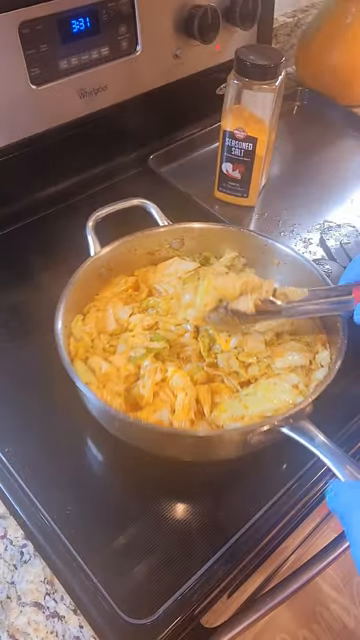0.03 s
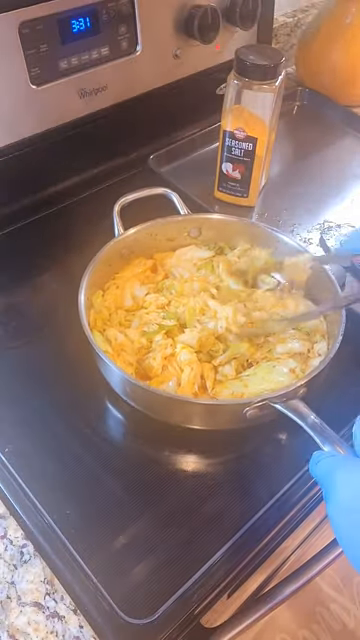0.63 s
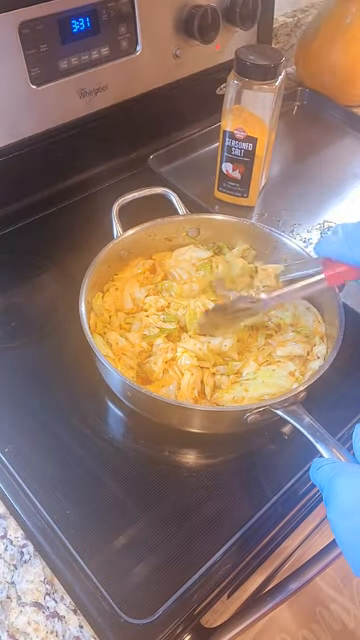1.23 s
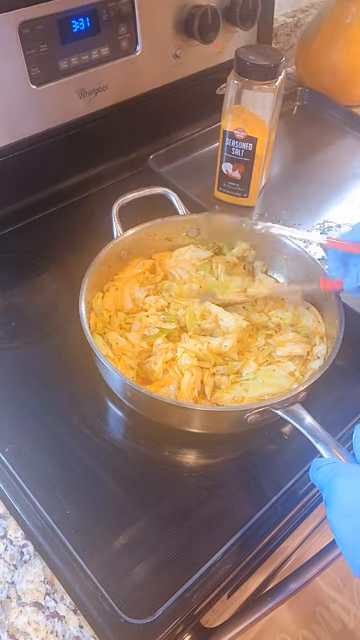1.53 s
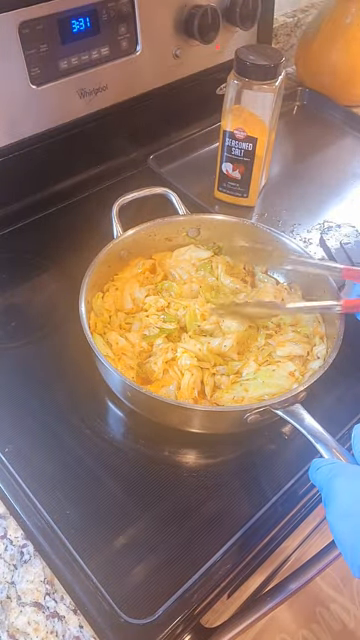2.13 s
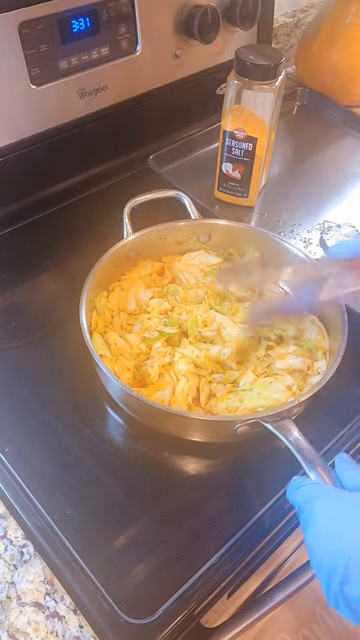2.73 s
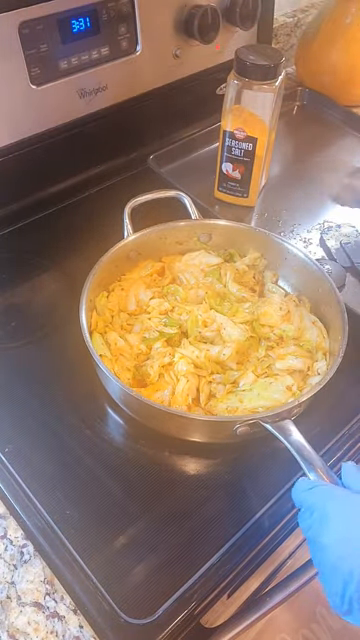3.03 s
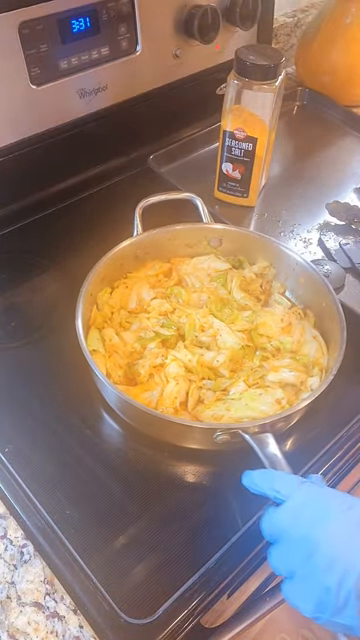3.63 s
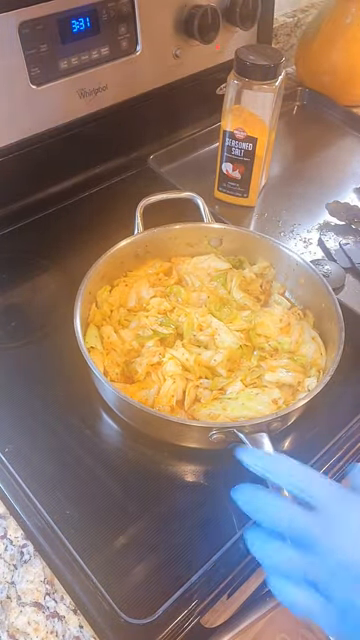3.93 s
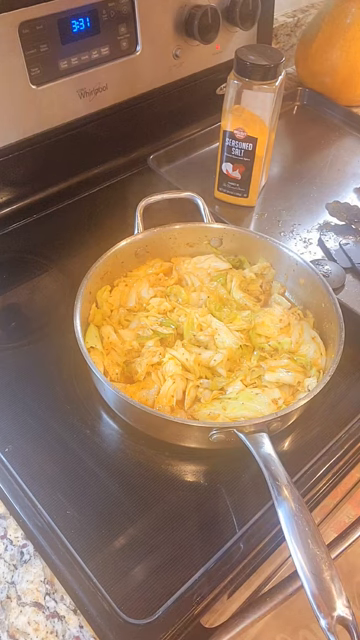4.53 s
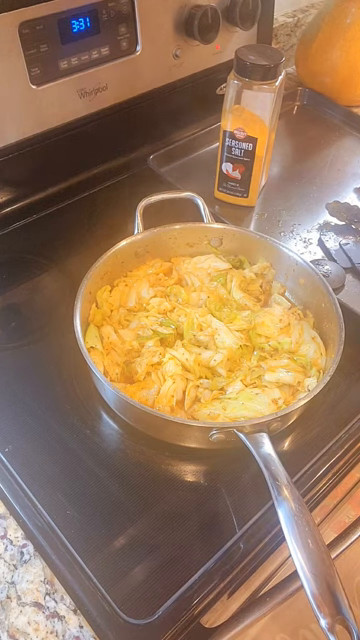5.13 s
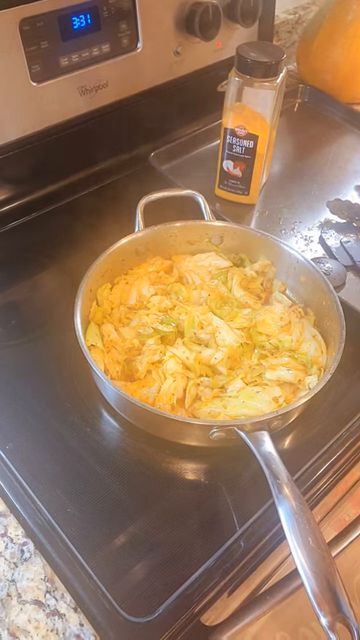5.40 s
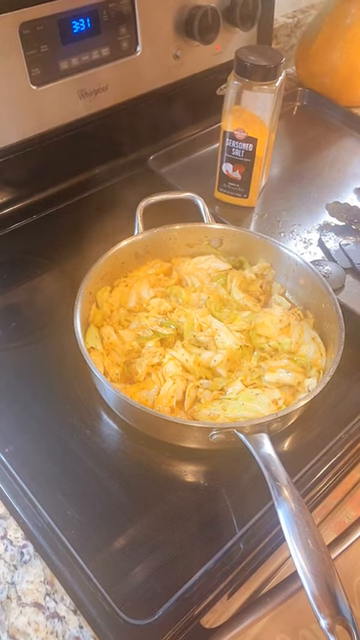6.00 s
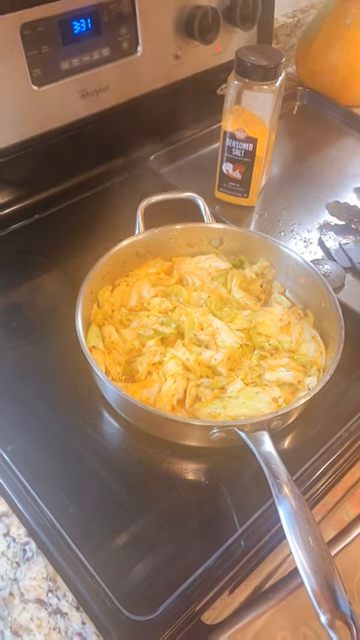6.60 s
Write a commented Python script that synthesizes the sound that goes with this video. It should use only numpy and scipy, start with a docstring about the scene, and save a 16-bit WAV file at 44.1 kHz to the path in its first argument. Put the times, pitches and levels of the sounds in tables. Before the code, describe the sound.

An appliance hums low in a kitchen while cabbage fries faintly in a steel skillet, heard in stereo from close by. A loud clank of tongs on the pan thumps the hollow stove top, followed by a soft, wet tossing of leaves. Three bright taps ring on the rim, and the tongs land on a metal tray with a short clatter. Quiet sizzling, small oil pops and a few light ticks remain.

```python
"""A kitchen, stereo microphone close to the stove. An appliance hums low in the room while cabbage
sizzles faintly in a steel skillet on a glass cooktop, bubbles bursting in the hot oil.
Tongs toss the food and knock the skillet against the stove, are tapped three times on its rim, then
clatter down on a metal tray: each blow sets the steel ringing, thumps the hollow stove top and dies
away in the room. A few light utensil ticks follow."""
import sys
import numpy as np
from scipy import signal
from scipy.fft import rfft, irfft, next_fast_len
from scipy.io import wavfile

SR = 44100
rng = np.random.default_rng(int(sys.argv[2]) if len(sys.argv) > 2 else 0)


def int16_out(signal):
    """Quantize to a 16-bit WAV file."""
    q = np.round(np.clip(np.atleast_2d(signal).T, -1, 1) * 32767)
    wavfile.write(sys.argv[1], SR, q.astype(np.int16))


N = 298116
TIME = np.arange(N) / SR
AGE = TIME[:SR * 2 // 5]   # the 0.4 s that follow a blow
EDGES = np.geomspace(22, 17000, 30)   # third-octave bands, Hz
CENTRES = np.sqrt(EDGES[1:] * EDGES[:-1])
BANK = [signal.butter(2, pair, "band", fs=SR, output="sos") for pair in zip(EDGES, EDGES[1:])]
# sound from close to the microphone: f/Hz, left-right likeness
NEAR_LIKENESS = [(100, 0.88), (300, 0.97), (700, 0.96), (2000, 0.17), (12000, 0.036)]


def from_db(db):
    """Decibels to gain."""
    return 10 ** (np.asarray(db) / 20)


def rms_one(x):
    """Scale to rms 1."""
    return x / np.sqrt(np.mean(x ** 2) + 1e-20)


def energy_one(x):
    """Scale a short sound to an average energy of 1 per channel."""
    return rms_one(x) / np.sqrt(x.shape[-1])


def in_time(points):
    """Read a table at every sample of the scene."""
    return np.interp(TIME, *np.transpose(points))


def at_hz(points, hz):
    """Read a table on a log-frequency axis."""
    table_hz, values = np.transpose(points)
    return np.interp(np.log(hz), np.log(table_hz), values)


def add(out, s, sound):
    """Mix a sound in at time s."""
    i = round(s * SR)
    out[:, i:i + sound.shape[-1]] += sound[..., :N - i]


def dying(t60):
    """Exponential decay, 60 dB down after t60 seconds."""
    return np.exp(-np.log(1000) * AGE / t60)


def drift(rate):
    """Random wander of rms 1, turning rate times a second."""
    knots = rng.standard_normal(1024)
    return rms_one(np.interp(TIME * rate, np.arange(len(knots)), knots))


def filtered(x, order, hz, kind="band"):
    """Butterworth filter."""
    return signal.sosfilt(signal.butter(order, hz, kind, fs=SR, output="sos"), x)


def resonate(x, hz, width):
    """A resonance with gain 1 at its peak."""
    r = np.exp(-np.pi * width / SR)
    feedback = [1, -2 * r * np.cos(2 * np.pi * hz / SR), r * r]
    return signal.lfilter(np.array([1, 0, -1]) * (1 - r * r) / 2, feedback, x + 1e-18)


def peaking(x, peaks):
    """Lift or hollow out a chain of bands."""
    for hz, width, db in peaks:
        x = x + (from_db(db) - 1) * resonate(x, hz, width)
    return x


def bell_curve(hz, centre_hz, octaves):
    """Gaussian weight around one pitch."""
    return np.exp(-.5 * (np.log2(hz / centre_hz) / octaves) ** 2)


def noise_bands(likeness, size, low=0, high=SR):
    """Third-octave stereo noise; neighbouring bands are unrelated."""
    white = rng.standard_normal((2, 2, size))
    for k, (sos, hz) in enumerate(zip(BANK, CENTRES)):
        if low < hz < high:
            mid, side = signal.sosfilt(sos, white[k % 2])
            alike = np.clip(at_hz(likeness, hz), -1, 1)
            yield hz, np.sqrt(1 + alike) * mid + np.sqrt(1 - alike) * side * [[1], [-1]]


def wash(colour, flicker_db):
    """Steady, diffuse coloured noise whose bands flicker a little."""
    # sound arriving from all round the room: f/Hz, left-right likeness
    far_likeness = [(60, 0.88), (150, 0.42), (380, 0.62), (950, 0.12), (2380, -2.6), (5980, -0.13),
                    (15000, 0.024)]
    bands = noise_bands(far_likeness, N, low=colour[0][0], high=colour[-1][0])
    return rms_one(sum(band * from_db(at_hz(colour, hz) + flicker_db * drift(11)) for hz, band in bands))


def room_tone():
    """In the background an appliance motor hums, wavering, over a low rush of air."""
    # motor tones: f/Hz, level/dB, waver/Hz
    motor_tones = [(104.5, -58, 1.32), (209.8, -62.5, 4.3), (280, -65, 4.42), (525, -68, 9.66),
                   (932, -77, 6.22), (1140, -86, 8.5), (1398, -77.5, 8.15)]
    # course of the rush of air: t/s, level/dB
    air_level = [(0, -51.5), (1.6, -53.5), (3.2, -51), (4.5, -51.5), (6.76, -50.5)]
    # its spectrum: f/Hz, level/dB
    air_colour = [(15, -57), (25, -66), (43, -8.5), (75, -7.5), (85, -18), (106, -24), (121, -1.5),
                  (140, -35), (214, 2.5), (238, -6), (308, -5.5), (445, -21), (525, -11), (800, -21),
                  (1400, -24.5), (2000, -36), (2600, -64), (4400, -120)]
    hum = np.zeros(N)
    for hz, db, waver in motor_tones:
        amplitude = np.sqrt(2) * from_db(db + 2 * drift(19))
        hum += amplitude * np.sin(2 * np.pi * np.cumsum(hz + waver * drift(40)) / SR)
    return hum + from_db(in_time(air_level) - 4) * wash(air_colour, flicker_db=1.8)


def oil_crackle(per_s=200, spread_db=7):
    """The finest bursts in the oil, uneven in size, each ring briefly at one of a few bright pitches."""
    # bright pitches at which the crackle rings: f/Hz, width/Hz, level/dB
    crackle_bands = [(3260, 340, 10), (4200, 220, 5.5), (5180, 1370, 5)]
    crackle = np.zeros(N)
    for hz, width, db in crackle_bands:
        clicks = np.zeros(N)
        at = np.flatnonzero(rng.random(N) < per_s / SR)
        signs = rng.choice([-1, 1], len(at))
        sizes = np.minimum(rng.exponential(1, len(at)), 2.5)
        clicks[at] = signs * from_db(db + spread_db * sizes)
        crackle += resonate(resonate(resonate(clicks, hz, width), hz, 2 * width), hz, 4 * width)
    return rms_one(crackle)


def small_bubbles(per_s=17, level_db=-54, spread_db=4, middle_hz=5000, octaves=0.286):
    """Smaller bubbles burst at random: rows of t/s, level/dB, f/Hz."""
    times = np.cumsum(rng.exponential(1, size=200)) / per_s
    sizes, pitches = np.clip(rng.standard_normal((2, 200)), -2, 2)
    rows = zip(times, level_db + spread_db * sizes, middle_hz * 2 ** (octaves * pitches))
    return [row for row in rows if row[0] < TIME[-1]]


def oil_pops(rise_s=.0009):
    """Bubbles burst on the right of the pan, each a short ping with a spit of noise."""
    # the loudest bubbles: t/s, level/dB, f/Hz
    loud_bubbles = [(0.623, -49, 5400), (0.738, -45, 4100), (0.8423, -49, 5530), (0.873, -41.5, 3970),
                    (1.1315, -44, 5360), (1.4327, -49, 4260), (1.604, -39.5, 5570), (1.7382, -43, 5020),
                    (1.8026, -45, 5400), (1.929, -43, 5320), (2.5691, -43.5, 5450), (2.9864, -47, 4350),
                    (3.1622, -41, 5430), (3.3117, -40.5, 5850), (4.0582, -46.5, 4120), (4.2497, -42, 5420),
                    (4.2784, -43.5, 5600), (4.5321, -47, 5450), (4.6574, -41.5, 4280),
                    (4.8246, -40.5, 4140), (5.0655, -46, 4400), (5.2776, -40, 5240), (5.69, -45, 4260),
                    (5.834, -45.5, 5250), (5.9236, -50, 5950), (6.0133, -50, 4440), (6.1125, -45, 6470),
                    (6.2554, -42.5, 4360), (6.3878, -45, 4370), (6.4757, -50, 5350), (6.5091, -45.5, 5900)]
    # their place in the stereo image: gain/dB, left then right
    placement_db = [
        [-2.5],
        [1],
    ]
    pops, age = np.zeros((2, N)), AGE[:SR // 20]
    swell = age / rise_s * np.exp(1 - age / rise_s)
    tail = .15 * dying(.06)[:len(age)]
    for s, db, hz in loud_bubbles + small_bubbles():
        ping = 0.92 * np.sin(2 * np.pi * hz * age) * swell
        spit = filtered(rng.standard_normal((2, len(age))) * (swell + tail), 3, [3700, 6100])
        add(pops, s, from_db(db + 2.5) * (ping + spit))
    return from_db(placement_db) * pops


def sizzle():
    """Bubbles burst in the hot oil: a fine hiss, crackle, pops and a faint whistle of steam."""
    # vigour of the frying while the food is stirred, and once it rests: t/s, level/dB
    stirred = [(0.0, -63.5), (1.794, -64.5), (1.9, -64)]
    resting = [(4.05, -60.5), (4.23, -61), (4.73, -58.5), (5.131, -62), (6.57, -59.5), (6.76, -60.5)]
    # spectrum of the hiss: f/Hz, level/dB
    hiss_colour = [(1000, 3), (1500, 1), (2100, -1.5), (2700, -2.5), (3600, -3.5), (5400, -2), (6500, 3.5),
                   (8200, -4), (10500, -17), (12500, -4.5), (15500, -23)]
    crackle, pops = oil_crackle(), oil_pops()
    steam = rms_one(resonate(resonate(rng.standard_normal((2, N)), 6440, 220), 6440, 220))
    hiss = wash(hiss_colour, flicker_db=1)
    vigour = from_db(in_time(stirred + resting) + 2.5)
    return vigour * (hiss + from_db(-3.5) * crackle + from_db(-12.5) * steam) + pops


def tossing(attack_s=0.027, settle_db_per_s=33, rustle_width_s=0.03):
    """Soft leaves flop into the pan as the tongs turn them, then settle; at times they rustle wetly."""
    # turns of the food: t/s, length/s, level/dB
    turns = [(0.505, 0.42, -46.5), (2.41, 0.27, -51)]
    # wet leaves sliding over each other: t/s, level/dB
    slides = [(0.32, -56), (0.63, -57), (0.77, -60), (0.88, -58.5), (1.3, -60), (1.82, -66.5),
              (2.64, -51.5)]
    turning = sum(from_db(db - settle_db_per_s * np.maximum(TIME - s - length, 0))
                  * np.clip((TIME - s) / attack_s, 0, 1) for s, length, db in turns)
    sliding = sum(from_db(db) / (1 + ((TIME - s) / rustle_width_s) ** 2) for s, db in slides)
    flops = filtered(rng.standard_normal(N) * from_db(4 * drift(26.41)), 2, [100, 230])
    rustle = filtered(rng.standard_normal((2, N)) * from_db(2.5 * drift(120)), 2, [900, 5000])
    return turning * rms_one(flops) + sliding * rms_one(rustle)


def stove_thump():
    """The hollow stove top booms under a blow; it radiates no deep bass."""
    # modes of the stove top: f/Hz, level/dB, t60/s
    stove_modes = [(72.8, -9, 0.37), (114.9, -13.5, 0.53), (142.5, 6, 0.19), (176, -2, 0.094),
                   (210, -14.5, 0.32), (255.5, 0, 0.097), (310.3, -2.5, 0.206), (380.4, -5.5, 0.23)]
    boom = sum(from_db(db) * np.sin(2 * np.pi * hz * AGE) * dying(t60) for hz, db, t60 in stove_modes)
    return energy_one(filtered(boom, 4, 62, "high"))


def snap():
    """The first hard touch of steel: a very short, bright click."""
    click = rng.standard_normal((2, len(AGE))) * dying(t60=0.0033)
    return energy_one(filtered(click + 1e-18, 2, [7850, 15000]))


def utensil_ticks():
    """Light, damped touches to the right: a snap, two resonances about an octave apart, a soft thump."""
    # touches: t/s, level/dB, lower resonance f/Hz, width/octaves, t60/s, stove thump/dB, snap/dB
    touches = [(1.002, -25, 270, 0.9, 0.078, -12.5, -47), (5.5383, -20.5, 1300, 0.68, 0.082, -23.5, -31),
               (5.569, -24, 2970, 0.37, 0.16, -35, -47), (6.581, -26, 2944, 1, 0.023, -16, -36),
               (6.619, -13.5, 4000, 0.51, 0.015, -24, -42), (6.6188, -15, 650, 0.48, 0.014, -30, -50),
               (6.7157, -8.5, 613, 0.74, 0.02, -16, -44)]
    out, boom = np.zeros((2, N)), stove_thump()
    for s, level_db, low_hz, octaves, t60, thump_db, snap_db in touches:
        burst = sum(band * (bell_curve(hz, low_hz, octaves) + .45 * bell_curve(hz, 1.9 * low_hz, octaves))
                    for hz, band in noise_bands(NEAR_LIKENESS, len(AGE)))
        tick = energy_one(burst * (dying(t60) + from_db(-33.5) * dying(0.5)))
        touch = from_db(level_db) * tick + from_db(snap_db) * snap()
        add(out, s, touch * from_db([[-7], [2]]) + from_db(thump_db) * boom)
    return out


def clank(blows, modes, favour_octaves=0.22, build_s=0.0086):
    """Each blow snaps, thumps the stove and sets the strong modes of the steel ringing."""
    out, boom = np.zeros((2, N)), stove_thump()
    mode_hz, mode_db, _ = np.transpose(modes)
    rings = np.array([energy_one(dying(t60)) * np.exp(2j * np.pi * hz * AGE) for hz, _, t60 in modes])
    for s, snap_db, thump_db, ring_db, clank_hz, clank_db in blows:
        add(out, s, from_db(thump_db) * boom + from_db(snap_db) * snap())
        # the point of contact favours the modes around one pitch
        favour_db = clank_db * bell_curve(mode_hz, clank_hz, favour_octaves)
        phases = rng.uniform(0, 2 * np.pi, len(modes)) + rng.normal(0, .7, (2, len(modes)))
        gains = energy_one(from_db(mode_db)) * from_db(favour_db + rng.normal(0, 1, len(modes)))
        ringing = np.sqrt(2) * np.imag((gains * np.exp(1j * phases)) @ rings)
        add(out, s, from_db(ring_db) * ringing * (1 - dying(build_s)))
    return out


def strike(blows, colour, modes, body_t60, room_db, crack_db, snap_db, jaw_lag_s=0.0031, bounce_s=0.011):
    """Tongs clank on steel: two jaws land, then bounce; each contact cracks and rings into the room."""
    # blows: t/s, level/dB, tilt/(dB per octave), stove thump/dB, second jaw/relative dB,
    #        bounce/relative dB, ring/dB, clank f/Hz, clank lift/dB
    clanks, contacts = [], []
    for s, db, tilt_db, thump_db, jaw_db, bounce_db, ring_db, clank_hz, clank_db in blows:
        clanks.append((s, db + snap_db, thump_db, ring_db, clank_hz, clank_db))
        for lag_s, relative_db in [(0, 0), (jaw_lag_s, jaw_db), (bounce_s, bounce_db)]:
            contacts.append((s + lag_s, db + relative_db, tilt_db))
    out = clank(clanks, modes)
    # reverberation of the kitchen: f/Hz, t60/s
    kitchen_decay = [(100, 0.11), (260, 0.63), (700, 0.5), (1840, 0.44), (4850, 0.4), (12800, 0.4)]
    # the food damps the metal quickly; the kitchen takes over
    near_power = dying(body_t60) ** 2 + (from_db(crack_db) * dying(0.0063)) ** 2
    room_tails = from_db(room_db) * dying(at_hz(kitchen_decay, CENTRES)[:, None])
    fades = from_db(at_hz(colour, CENTRES))[:, None] * np.sqrt(near_power + room_tails ** 2)
    onset = 1 - dying(0.0049)   # bending waves take a moment to fill the metal
    size, step = len(AGE), SR // 20
    bands = np.array([band for _, band in noise_bands(NEAR_LIKENESS, size + step * len(contacts))])
    # the dense ringing is strongest in a narrow band around each upper mode, differently for each blow
    lifts_db = 5 * (1 + .7 * rng.uniform(-1.2, 1, (len(blows), len(modes))))
    for k, (s, db, tilt_db) in enumerate(contacts):
        tilt = from_db(tilt_db * np.log2(CENTRES / 2500))
        dense = np.einsum("bct,bt->ct", bands[..., k * step:k * step + size], fades * tilt[:, None])
        clusters = [(hz, 42.4, lift) for (hz, _, _), lift in zip(modes, lifts_db[k // 3]) if hz > 700]
        add(out, s, from_db(db) * energy_one(peaking(dense * onset, clusters)))
    return out


def skillet_knocks():
    """The tongs knock the steel skillet against the stove."""
    # knocks: t/s, level/dB, then as listed in strike()
    knocks = [(0.3675, 0, -0.5, -22, -11, -19, -11, 3300, -1),
              (0.3735, 17.5, 1, 16.5, -6.5, -6.5, 9.5, 1100, -0.5),
              (0.391, 6, 4.5, -1, -12, -1.5, -7, 800, 12),
              (0.4305, 10.5, -0.2, 10.5, -9, -16, -1, 3350, 12)]
    # dense ringing of the skillet: f/Hz, level/dB
    colour = [(120, -18), (200, 10), (339, -22), (446, -3), (575, -19.5), (798, -3), (992, -9.5),
              (1230, -6.5), (1400, -26), (1540, -6), (1880, -7), (4260, -10), (4650, -13.5), (5450, -15),
              (7500, -19.5), (10200, -41), (12200, -29), (15500, -60)]
    # modes that stand out: f/Hz, level/dB, t60/s
    modes = [(258, 1.5, 0.17), (433, -4, 0.28), (770, -6, .45), (786, 7, 0.36), (910, 6, 0.33),
             (1046, 6, 0.2), (1130, -5.5, .42), (1210, 10, 0.22), (1250, -1, 0.17), (1510, -1, 0.13),
             (1510, 3, 0.25), (1765, 11.5, 0.13), (1981, -1, 0.2), (2250, 0, 0.52), (2750, -10.5, .26),
             (3290, -4, 0.22), (3340, -4, 0.28), (3370, -2, 0.37), (4220, -1, 0.27), (4050, 0, .33),
             (4200, -9, 0.45), (4700, -3, 0.12), (5620, 10, 0.069), (6400, -12, 0.091)]
    return strike(knocks, colour, modes, body_t60=0.17, room_db=-8.5, crack_db=21, snap_db=-36)


def rim_taps():
    """The tongs are tapped three times on the rim; their arms colour the sound."""
    # taps, the first one double: t/s, level/dB, then as listed in strike()
    taps = [(1.9665, -7.5, -8, -8, -17, -20, -4, 5200, -3), (1.9706, 0.5, 0, 3, 2.5, -27, 1, 4160, 5),
            (2.1345, 8.5, -0.13, -0.5, 0, -13, 8.5, 4450, 3.5),
            (2.3708, 8.5, 0, 9.5, -4.5, -3.5, 5, 1900, 9.5)]
    # dense ringing of rim and tongs: f/Hz, level/dB
    colour = [(100, -29), (190, 8.5), (245, 12.5), (420, 5.5), (1100, 3.5), (1350, -2), (1650, 10.5),
              (2050, 2.5), (2600, 6.5), (4000, 1.5), (5200, 0.5), (6200, 1), (9500, -9), (12500, -8),
              (15000, -24)]
    # modes that stand out: f/Hz, level/dB, t60/s
    modes = [(71, 2.5, .65), (262, 3, 0.2), (374, 6, 0.31), (550, 5, 0.2), (743, -5, 0.4),
             (1205, -11, 0.28), (1344, -2, 0.12), (1460, -14, 0.28), (1925, -5, 0.24), (2041, -7, 0.32),
             (2172, -8, 0.35), (3330, 4, 0.059), (3750, 8.5, 0.088), (3962, -16, 0.67), (4190, -8, 0.15),
             (4387, 1, 0.067), (4940, 9, 0.039), (5060, 9.5, 0.05), (5300, 7.5, 0.034), (5630, -19, 0.15),
             (5600, -11, 0.16), (6160, -5, 0.029), (6020, -13, 0.09), (6030, -10, .15), (7300, -2, 0.16)]
    # resonances and dead bands of the arms: f/Hz, width/Hz, gain/dB
    arm_peaks = [(1066, 80, -13), (1644, 270, -14), (2050, 410, 5), (2484, 590, -12.5), (3370, 240, -14),
                 (4540, 160, -12), (5450, 570, 6), (6280, 220, 4.5)]
    tapping = strike(taps, colour, modes, body_t60=0.11, room_db=-12.5, crack_db=19.5, snap_db=-24)
    return peaking(tapping, arm_peaks)


def tray_clatter():
    """The tongs clatter down on a metal tray and set it ringing."""
    # hits: t/s, level/dB, then as listed in strike()
    hits = [(3.3358, 6, 1.1, -1, 0, -2, 4.5, 3920, 7.1),
            (3.5398, -5.5, 0.81, -9.5, 6.5, 5.5, -1.5, 4070, 5.5),
            (3.5755, -9, 0.023, -10, -13, -1, -23, 4200, 5.7),
            (3.7328, 4, 0.25, -1, 2.5, 7, 9.5, 1150, 2.2), (3.7590, 7, 0.32, -5, -17, -12, 1, 2200, 4.3)]
    # dense ringing of the tray: f/Hz, level/dB
    colour = [(45, -42), (120, -4), (200, 11.5), (392, 7), (471, 8.5), (690, 3.5), (742, 4), (1190, 8),
              (1590, 6), (2420, 8), (3010, 7), (4030, 6), (7350, 0), (9830, -11), (13000, -5), (15500, -24)]
    # modes that stand out: f/Hz, level/dB, t60/s
    modes = [(205, -1, .4), (282, -4, .2), (378, -1, 0.4), (538, -6, 0.35), (689, -3, 0.17),
             (816, -6, 0.35), (890, -2.5, 0.33), (1215, 3, 0.16), (1450, -3, .2), (1763, -2, 0.2),
             (1965, -1, 0.22), (2153, -5, .3), (2250, -1, 0.17), (2352, 0, 0.2), (2495, 1, 0.26),
             (2673, 2, .15), (3065, -2, 0.26), (3217, 2, 0.13), (3327, -1, .17), (3464, 2, .13),
             (3628, -3, .14), (3785, 0, 0.13), (3935, 3, 0.11), (4070, -3, .24), (4295, 2, .16),
             (4395, -1, 0.1), (4834, -3, 0.12), (5260, -3, .17), (5580, -4, 0.11)]
    return strike(hits, colour, modes, body_t60=0.15, room_db=-10, crack_db=15, snap_db=-25)


def scene():
    """At the stove: metal in front, each piece placed between left and right; frying and hum behind."""
    skillet = from_db([[-3], [-5]]) * skillet_knocks()
    rim = from_db([[-3.5], [-1.5]]) * rim_taps()
    tray = from_db([[-2.5], [-2]]) * tray_clatter()
    metal = filtered(skillet + rim + tray, 3, 48, "high")
    return metal + utensil_ticks() + sizzle() + tossing() + room_tone()


def record(dry):
    """Two microphone ports, each with its own colour, the right later; peaks rounded, the top cut."""
    # balance of the ports: f/Hz, left minus right/dB
    port_balance = [(60, 2), (92, -3.5), (140, 0), (210, -4), (330, -1.5), (500, -3), (770, -3), (1170, -3),
                    (1790, -3.5), (2740, -2), (4190, -9), (6410, -3.5), (9810, 5), (15000, -11)]
    right_lag_s, cutoff_hz = .00012, 15400
    size = next_fast_len(N + SR // 10)
    hz = np.maximum(np.arange(size // 2 + 1) * SR / size, 1)
    balance = from_db(at_hz(port_balance, hz) * np.array([[.5], [-.5]]))
    delay = np.exp(-2j * np.pi * hz * np.array([[0], [right_lag_s]]))
    heard = irfft(rfft(dry, size) * balance * delay, size)[:, :N]
    top_cut = signal.ellip(10, .2, 80, cutoff_hz, fs=SR, output="sos")
    return signal.sosfilt(top_cut, np.tanh(heard))


dry = scene()
out = record(dry)
int16_out(out)
```